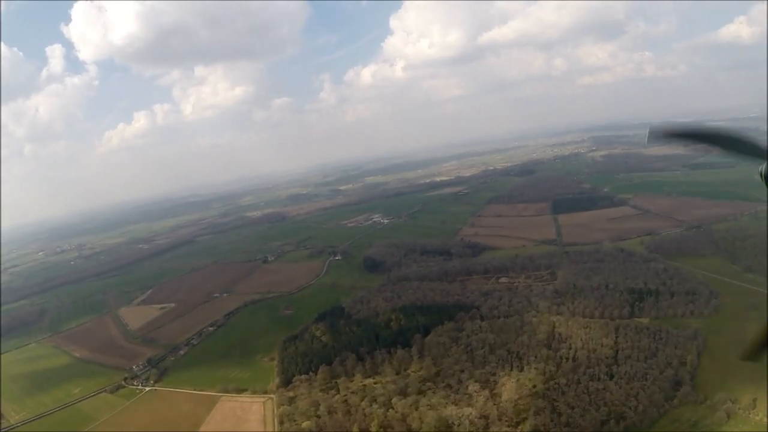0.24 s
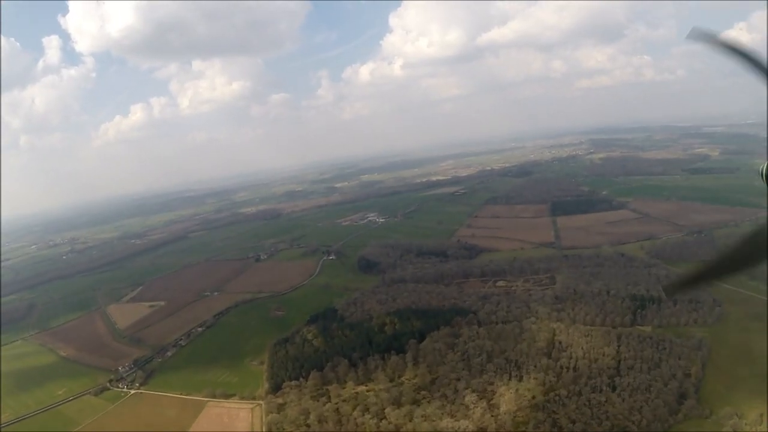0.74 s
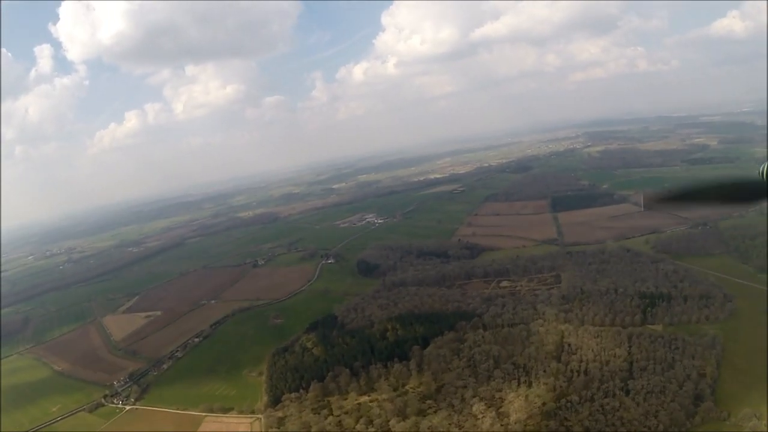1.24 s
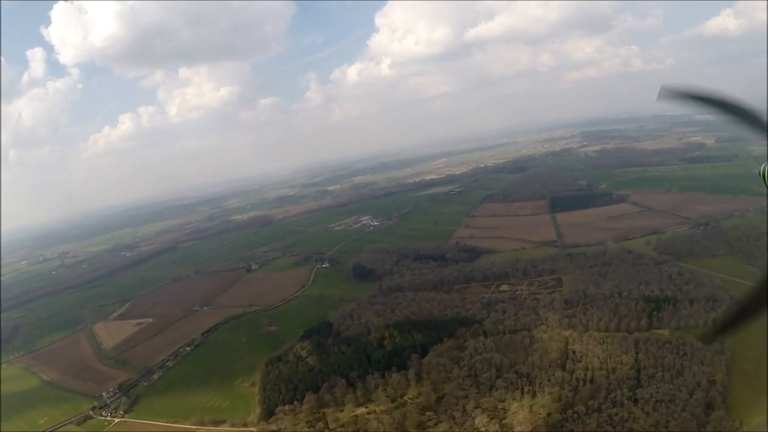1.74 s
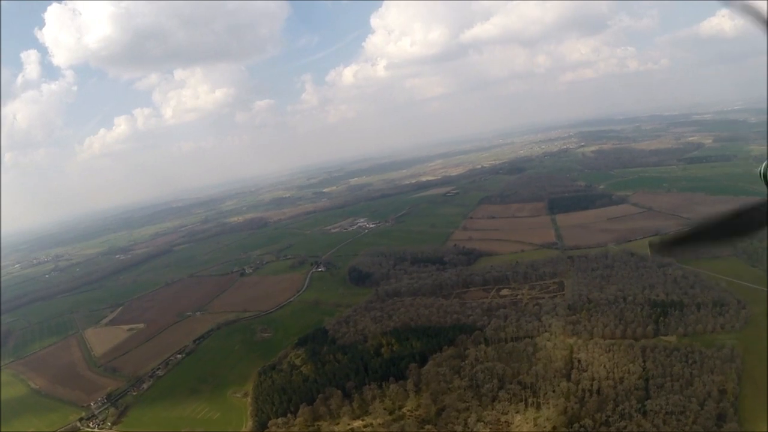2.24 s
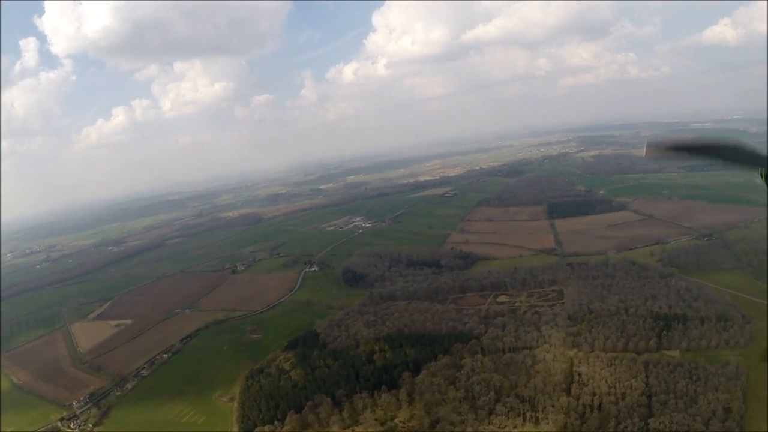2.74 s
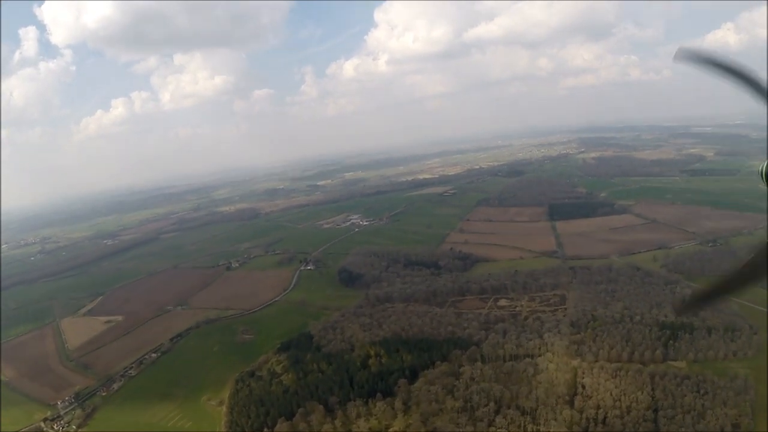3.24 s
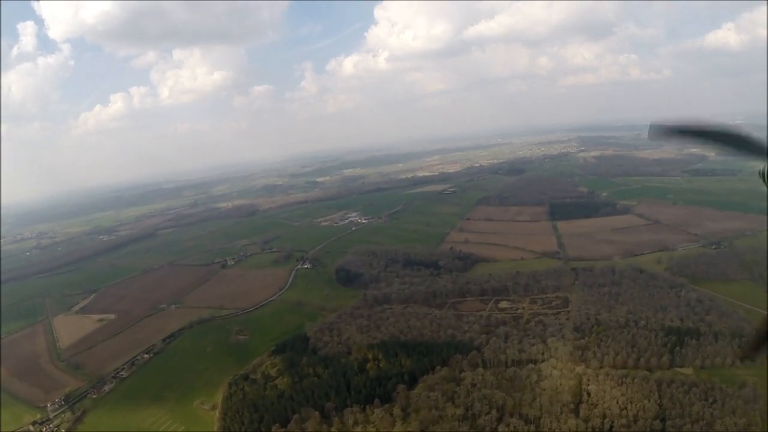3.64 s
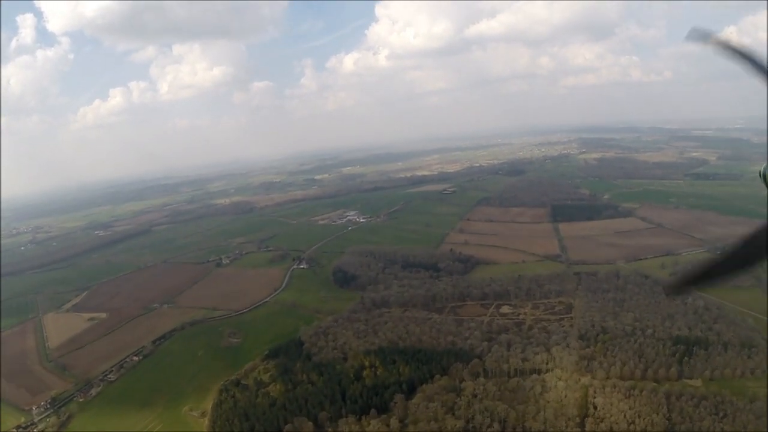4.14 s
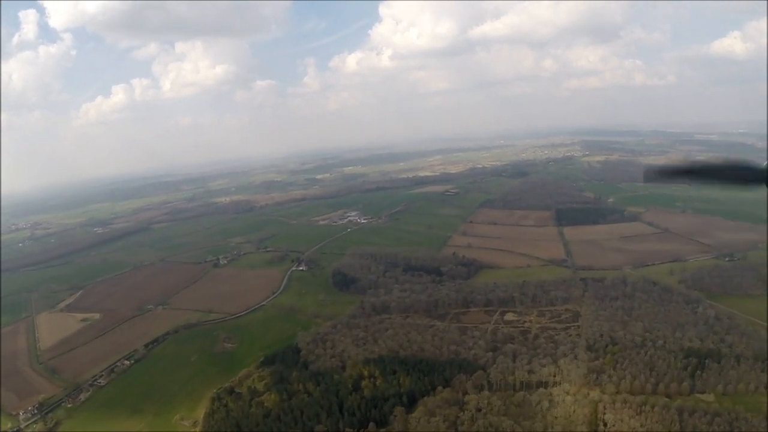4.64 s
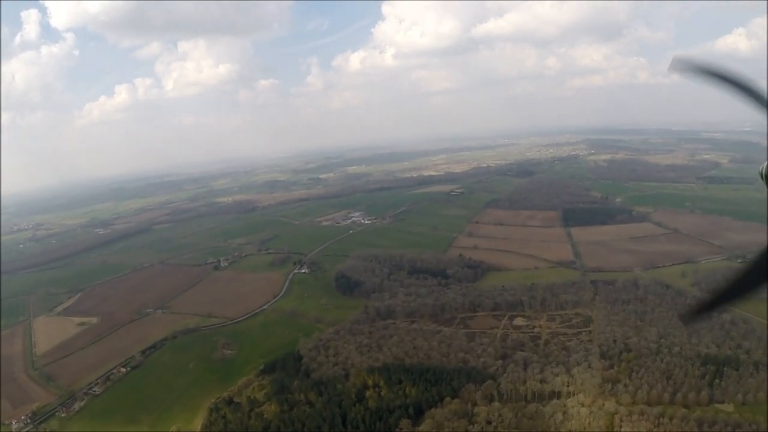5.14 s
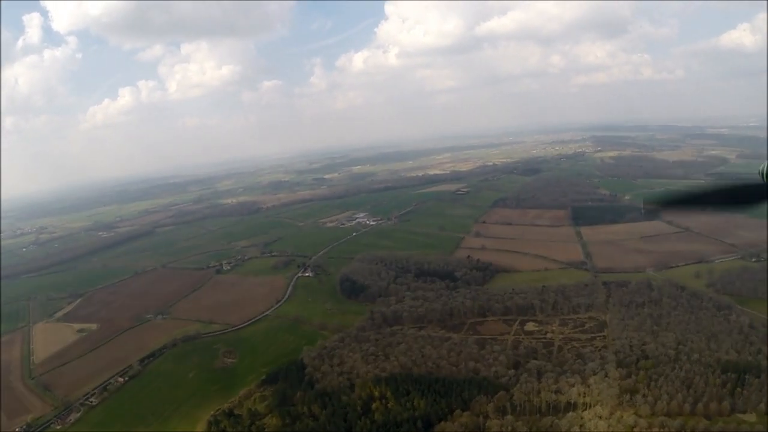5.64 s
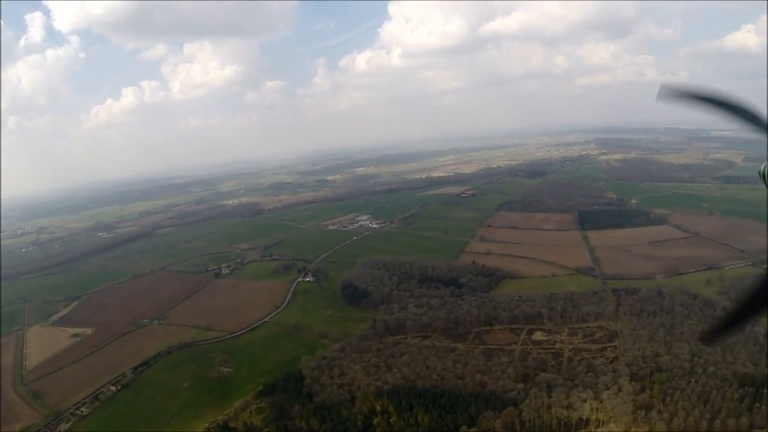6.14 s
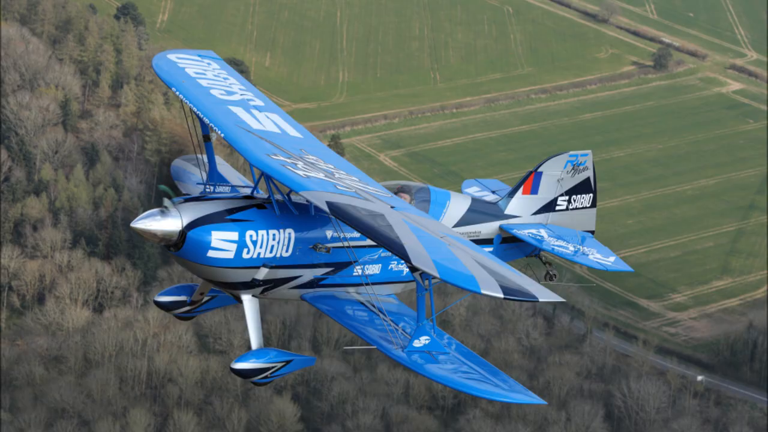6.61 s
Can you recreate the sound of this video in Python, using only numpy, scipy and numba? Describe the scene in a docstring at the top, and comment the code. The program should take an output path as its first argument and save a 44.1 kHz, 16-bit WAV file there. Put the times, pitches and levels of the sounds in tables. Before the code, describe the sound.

Loud steady rush of air over a camera fixed to a light aircraft, faint engine and propeller hum beneath, then an abrupt cut to silence.

```python
"""Riding in the slipstream of a light aircraft

The aircraft cruises at steady power, heard by a camera fixed to it; one microphone feeds both channels.
Air rushing over the housing is noise coloured by its cavities; engine and two-blade propeller hum through it
as sines on multiples of the shaft speed, and a thin edge whistles as one wavering sine.
Gain control rides the peaks, and the sound is cut off to silence shortly before the end."""
import sys
import numpy as np
from scipy import signal
from scipy.fft import rfft, irfft, next_fast_len
from scipy.io import wavfile
from scipy.ndimage import uniform_filter1d
from numba import njit

SR = 44100
rng = np.random.default_rng(int(sys.argv[2]) if len(sys.argv) > 2 else 0)


def master_out(mix):
    """Clip the mix to full scale and print it as 16-bit PCM to the path in sys.argv[1]."""
    frames = np.transpose(np.atleast_2d(mix))
    ceiling = np.clip(frames, -1, 1)
    pcm = np.round(ceiling * 32767).astype(np.int16)
    wavfile.write(sys.argv[1], SR, pcm)


N = 303213

SHAFT_HZ = 38.36  # mean turns a second

# the rush: its level, and the spread of its quick unsteadiness
AIR_DB = -13.5
GUST_DB = 0.8  # all octaves together
BUFFET_DB, FLICKER_DB = 0.5, 0.25  # each low octave alone, each high octave alone
WASH_DB = 0.3  # swing once a turn of the shaft
# slow swells of the bass and of the octave round 1 kHz: spread, changes a second
SWELL_DB, SWELL_PER_S = 0.6, 1.6
# the whole rush dips briefly once: moment, half length, depth
DIP_S, DIP_HALF_S, DIP_DB = 2.475, 0.03, -2.0

# the edge whistle slips once to a lower pitch: before, after, middle and length of the slip
WHISTLE_DB = -47.8
WHISTLE_HZ, SLIPPED_HZ, SLIP_S, SLIP_LENGTH_S = 9488, 9462, 2.35, 0.5

CUT_S, TOP_HZ = 6.3997, 15180  # moment of the cut, top of the microphone's band


def undb(db):
    """Decibels to gain."""
    return 10 ** (np.asarray(db) / 20)


def walk(rate):
    """Random levels held about 1 / rate s and smoothed twice; mean 0, spread 1."""
    hold = int(SR / rate)
    steps = np.repeat(rng.standard_normal(N // hold + 1), hold)
    smooth = uniform_filter1d(uniform_filter1d(steps, hold), hold)[:N]
    return (smooth - smooth.mean()) / smooth.std()


def tone(hz, db):
    """A sine of moving pitch and RMS level, from a random start."""
    turns = np.cumsum(hz) / SR + rng.random()
    return np.sqrt(2) * undb(db) * np.sin(2 * np.pi * turns)


def housing_colour(f):
    """Spectrum in dB of air over the housing: a broad slope, then the bumps and dips of its cavities."""
    # broad colour of the rushing air, relative density: (f/Hz, level/dB)
    air = [(9, -34), (25, -15), (45, -10.5), (100, -11.5), (400, -12.5), (900, -11), (2000, -2.5),
           (3500, -7.5), (5000, -13.5), (7000, -24.5), (9500, -25), (11500, -35.5), (15200, -45.5)]
    # cavities of the housing and the hollows between them: (f/Hz, width/Hz, level/dB)
    housing = [(41, 8, 6), (133, 31, 4), (150, 59, 2), (170.6, 20, 4), (264, 67, 7), (702, 34, 3.5),
               (843, 120, 3), (1072, 191, 10), (1350, 150, 0.5), (1580, 190, 3), (1830, 149, 1),
               (2183, 200, -3), (2694, 304, 3.5), (2958, 258, 7), (3200, 208, -6), (3522, 137, 5),
               (3620, 150, 1), (4100, 250, 6.5), (4695, 230, 3), (5100, 230, -2), (5550, 300, 4),
               (5790, 150, -5.5), (5970, 250, -5), (6080, 180, 5), (6850, 190, 0.5), (7330, 760, 5),
               (8050, 250, -1.5), (8550, 450, 2), (9400, 700, -2), (10340, 550, 6), (12400, 800, 3.5)]
    hz, db = np.transpose(air)
    colour = np.interp(np.log(f), np.log(hz), db)
    for centre, width, peak_db in housing:
        colour = colour + peak_db * np.exp(-2 * ((f - centre) / width) ** 2)
    return colour


def slipstream():
    """Turbulent noise through the housing; gusts move all of it, and each octave also flickers alone."""
    size = next_fast_len(N)
    f = np.maximum(np.arange(size // 2 + 1) * SR / size, 1.0)
    noise = rfft(rng.standard_normal(size)) * undb(housing_colour(f))
    bass_db = SWELL_DB * walk(SWELL_PER_S)
    cavity_db = SWELL_DB * walk(SWELL_PER_S)
    rush = 0
    place = np.clip(np.log2(f / 32), 0, 9)  # octaves above 32 Hz
    for octave in range(10):
        # overlapping triangles on the octave scale add up to one
        share = np.maximum(1 - abs(place - octave), 0)
        band = irfft(noise * share, size)[:N]
        swell_db = bass_db if octave < 5 else cavity_db * (octave == 5)
        flicker_db = BUFFET_DB if octave < 6 else FLICKER_DB
        rush = rush + band * undb(swell_db + flicker_db * walk(9.0))
    t = np.arange(N) / SR
    gust_db = GUST_DB * walk(14.0)
    # the wash of the propeller pulses faintly once a turn
    wash_db = WASH_DB * np.sin(2 * np.pi * SHAFT_HZ * t)
    dip_db = DIP_DB * np.exp(-((t - DIP_S) / DIP_HALF_S) ** 2)
    return rush * undb(AIR_DB + gust_db + wash_db + dip_db) / rush.std()


def engine(wander=0.0008, throb_db=0.6):
    """Shaft speed hunts by a small fraction; each multiple swells and sinks on its own."""
    # hum on multiples of the shaft speed, even ones from firings and blade passes: (multiple, level/dB)
    hum = [(1, -48), (2, -36.8), (4, -37), (6, -48), (8, -45), (10, -42.5), (11, -52), (12, -53), (14, -51),
           (16, -44), (18, -37.3)]
    speed = SHAFT_HZ * (1 + wander * walk(1.213))
    return sum(tone(multiple * speed, db + throb_db * walk(3.8)) for multiple, db in hum)


def whistle(waver=0.0011, drift=0.0009, flutter_db=1.5):
    """Vortices shed from a thin edge: a near sine that wavers in pitch (fractions) and level."""
    ends = SLIP_S + np.array([-0.5, 0.5]) * SLIP_LENGTH_S
    pitch = np.interp(np.arange(N) / SR, ends, [WHISTLE_HZ, SLIPPED_HZ])
    pitch = pitch * (1 + waver * walk(40.0) + drift * walk(3.0))
    return tone(pitch, WHISTLE_DB + flutter_db * walk(30.0))


def scene():
    """Rush, hum and whistle meet at one microphone, which feeds both channels."""
    return np.tile(slipstream() + engine() + whistle(), (2, 1))


@njit
def follow(x, attack, release):
    """Peak follower: climbs fast, sinks slowly, by a share of the gap each sample."""
    env, level = np.empty(len(x)), np.mean(np.abs(x)) * 2
    for i in range(len(x)):
        gap = abs(x[i]) - level
        level += gap * (attack if gap > 0 else release)
        env[i] = level
    return env


def record(dry, attack_s=0.006, release_s=0.05, squeeze=0.55):
    """Gain control ducks after peaks and recovers more slowly; then the abrupt cut and the top of the band."""
    env = follow(dry[0], min(1 / (attack_s * SR), 1.0), 1 / (release_s * SR))
    held = dry * (np.median(env) / env) ** np.clip(squeeze, 0, 1)  # squeeze 0: no control, 1: full
    held = held * (np.arange(N) < CUT_S * SR)
    top = signal.ellip(12, 0.5, 60, TOP_HZ, fs=SR, output="sos")
    return signal.sosfilt(top, held)


dry = scene()
out = record(dry)
master_out(out)
```